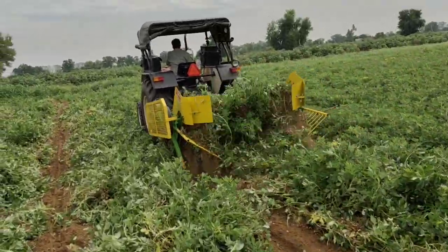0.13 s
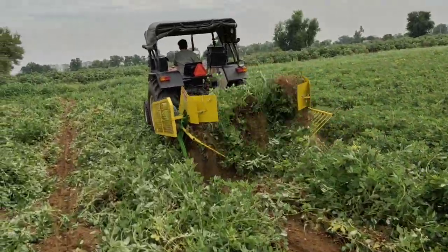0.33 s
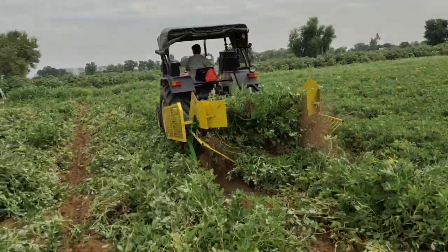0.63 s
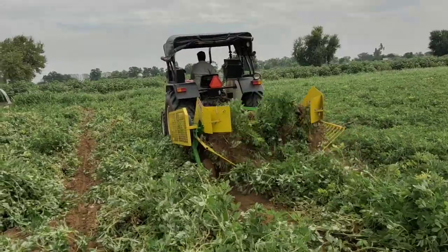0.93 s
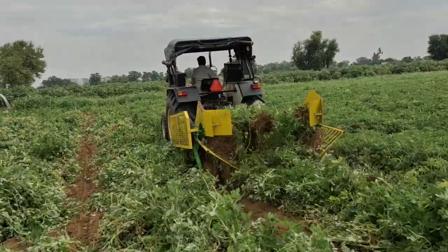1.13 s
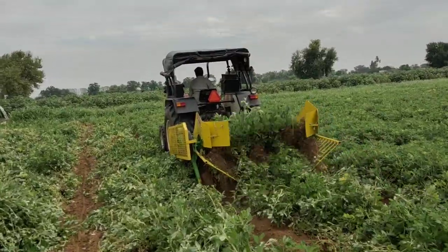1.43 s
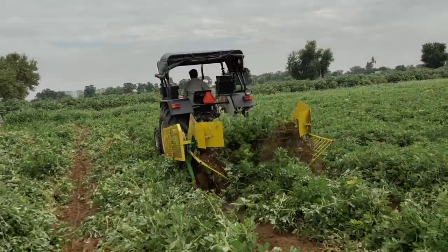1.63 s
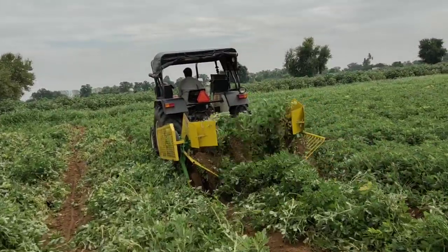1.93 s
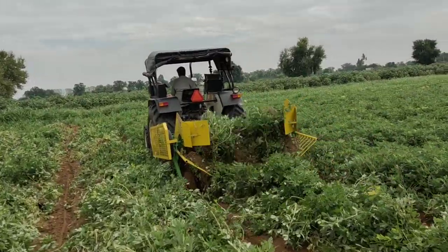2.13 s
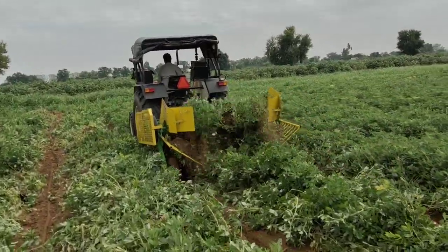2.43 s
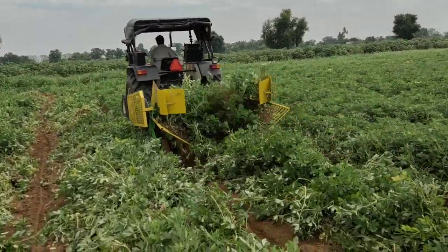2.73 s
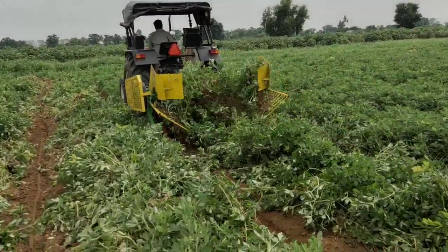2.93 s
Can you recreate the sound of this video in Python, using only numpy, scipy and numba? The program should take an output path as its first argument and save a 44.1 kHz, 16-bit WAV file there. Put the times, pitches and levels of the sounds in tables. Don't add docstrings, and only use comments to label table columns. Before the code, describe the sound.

Ringing metallic digger roar with gritty soil rattle and engine ticking, under bursts of low wind thumps.

```python
import sys
import numpy as np
from scipy import signal
from scipy.fft import rfft, irfft
from scipy.io import wavfile
from scipy.ndimage import uniform_filter1d
from numba import njit

SR = 44100
rng = np.random.default_rng(int(sys.argv[2]) if len(sys.argv) > 2 else 0)


def file_out(sig):
    cols = np.atleast_2d(sig).T
    lim = np.clip(cols, -1, 1)
    pcm = np.round(lim * 32767).astype(np.int16)
    wavfile.write(sys.argv[1], SR, pcm)


def gain_from_decibels(decibels):
    exponent = np.asarray(decibels, float) / 20
    return 10 ** exponent


N = 135387
TURNS_PER_S, FIRST_TURN_S = 28.71, 0.0021


def unit(x):
    return x / np.sqrt(np.mean(x ** 2))


def even(x):
    return x / np.sqrt(uniform_filter1d(x ** 2, SR // 10))


def curve(table, column):
    return np.interp(np.arange(N) / SR, np.array(table)[:, 0], np.array(table)[:, column])


def shape(table, hz):
    return np.interp(np.log(hz), np.log(np.array(table)[:, 0]), np.array(table)[:, 1])


def colour(x, table, tilt_db=0.):
    hz = np.maximum(np.arange(N // 2 + 1) * SR / N, 1)
    octaves_outside = np.maximum(np.log2(table[0][0] / hz), np.log2(hz / table[-1][0])).clip(0)
    gain_db = shape(table, hz) + tilt_db * np.log2(hz / 150) - 19 * octaves_outside
    return irfft(rfft(x) * gain_from_decibels(gain_db), N)


def band(x, hz, width):
    b, a = signal.iirpeak(hz, hz / width, fs=SR)
    return signal.lfilter(b, a, signal.lfilter(b, a, x))


def walk(rate):
    hold = int(SR / rate / 16)
    coarse = np.repeat(rng.standard_normal(N // (16 * hold) + 1), hold)
    coarse = uniform_filter1d(uniform_filter1d(coarse, hold), hold)
    return 1.3 * np.interp(np.arange(N) / 16, np.arange(len(coarse)), coarse)


def rings(rows, t60, pan_db, spread, attack_s=0.0028):
    out, t = np.zeros(N + 4096), np.arange(4096) / SR
    attack = np.sin(np.pi / 2 * np.minimum(t / attack_s, 1)) ** 2
    envelope = np.exp(-np.log(1000) * t / t60) * attack
    detunes = rng.standard_normal((len(rows), 5, 1))
    for (s, db, hz), detune in zip(rows, detunes):
        cluster = np.sin(2 * np.pi * hz * (1 + spread * detune) * t).sum(0) / 3
        start = int(s * SR)
        out[start:start + 4096] += gain_from_decibels(db) * envelope * cluster
    return out[:N] * gain_from_decibels(np.array([[pan_db], [-pan_db]]) / 2)


@njit
def sweep(x, hz, g, width):
    y = np.empty(x.shape)
    for c in range(x.shape[0]):
        b, l = 0., 0.
        for i in range(x.shape[1]):
            k = width / hz
            v = (b + g[i] * (x[c, i] - l)) / (1 + g[i] * (g[i] + k))
            b, l, y[c, i] = 2 * v - b, l + 2 * g[i] * v, k * v
    return y


# pitch in Hz, left over right in dB.
LEFT_OVER_RIGHT = [(60, 12), (110, -8), (200, 2.5), (380, 2.5), (700, -2.5), (1290, 4.5), (2380, 8),
                   (4400, 9), (8120, -1), (15000, -0.5)]
# pitch in Hz, share in common from 0 to 1.
LIKENESS = [(60, 1), (600, 0.99), (1400, 0.56), (3000, 0.44), (6000, 0), (15000, 0.04)]


def pair(hz, drive=1):
    likeness = np.clip(shape(LIKENESS, hz), 0, 1)
    mid, side = rng.standard_normal((2, N)) * drive
    sign = np.array([[1], [-1]])
    pan_db = shape(LEFT_OVER_RIGHT, hz) / 2 * sign
    return (np.sqrt((1 + likeness) / 2) * mid + np.sqrt((1 - likeness) / 2) * side * sign) * gain_from_decibels(pan_db)


# middle in seconds, length in seconds, pitch in Hz, gain in dB.
STRAINS = [(0.134, 0.12, 600, 25), (0.224, 0.17, 1520, 6.5), (0.398, 0.31, 2260, 3),
           (0.336, 0.11, 2970, 11), (0.457, 0.19, 1130, -7), (0.642, 0.12, 1900, 17),
           (0.736, 0.16, 3200, 7.5), (0.756, 0.36, 1160, -9.5), (0.835, 0.19, 2390, 6.5),
           (0.84, 0.078, 1520, 2), (0.918, 0.15, 970, 9.5), (1.152, .08, 693, 10),
           (1.242, 0.14, 3340, 10.5), (1.505, 0.3, 1830, 5), (1.668, 0.17, 1190, 12),
           (1.845, 0.82, 3555, 8), (1.87, 0.26, 693, 10), (2.11, 0.32, 2690, 10), (2.116, 0.11, 694, -16),
           (2.258, 0.15, 1000, 6), (2.263, 0.089, 2110, 8.5), (2.55, 0.097, 2080, 8),
           (2.628, 0.081, 680, 12.5), (2.736, 0.69, 1700, 6), (2.794, 0.32, 1270, 9),
           (2.866, 0.25, 2420, -4), (0.854, 0.47, 4270, 10), (2.496, 0.12, 4000, 6),
           (2.842, 0.2, 3300, -14)]


def strain(hz):
    t = np.arange(0, N + 256, 256) / SR
    db = 0
    for middle, length, centre, gain_db in STRAINS:
        octaves = np.log2(hz / centre)
        db = db + gain_db * np.exp(-(octaves / 0.13) ** 2 - (2 * (t - middle) / length) ** 4)
    return np.interp(np.arange(N) / SR, t, db)


def chain_links():
    links_per_s, first_link_s, depth = 62.5, 0.005, 0.3
    links = (np.arange(N) / SR - first_link_s) * links_per_s + 1
    size = gain_from_decibels(1.5 * rng.standard_normal(N // 500))[links.astype(int)]
    shove = 3 * size * np.exp(-(links % 1) / 0.11)
    return (1 - depth + depth * shove) * gain_from_decibels(1.6 * walk(900))


# pitch in Hz, width in Hz, level in dB.
FRAME = [(537.6, 132, -9), (682, 138, -7), (1011, 118, -1.5), (1130, 49, 0), (1308, 130, -6.5),
         (1520, 183, -3), (1747, 116, -4), (2125, 80, -8.5), (2260, 90, -3), (2485, 99, -3),
         (2760, 95, -7.5), (3072, 91, -8), (3300, 127, -6.5), (3847, 296, -14.5)]


def frame():
    drive = chain_links()
    modes = 0
    for hz, width, db in FRAME:
        g = np.tan(np.pi * hz / SR) * (1 + 0.032 * walk(4.894))
        swell_db = db + 3 * walk(12) + strain(hz)
        ring = sweep(pair(hz, drive), 1. * hz, g, 0.8 * width)
        ring = sweep(ring, 1. * hz, g, 2. * width)
        modes = modes + gain_from_decibels(swell_db) * np.sqrt(width) * unit(ring)
    return unit(modes)


# pitch in Hz, level in dB per Hz.
ROAR = [(70, -18), (150, -5.5), (320, -17), (600, -6), (820, -29), (1100, -9.5), (2500, -9), (4500, -37.5)]


def roar():
    bands = 0
    for hz in 100 * 2 ** np.arange(0, 5.6, .5):
        level_db = shape(ROAR, hz) + 2.2 * walk(13) + 0.76 * strain(hz)
        bands = bands + gain_from_decibels(level_db) * band(pair(hz), hz, hz / 3.1)
    return unit(bands)


# start in seconds, peak in dB, pitch in Hz.
CLANKS = [(0.2627, -31.5, 1624), (0.2927, -30, 2180), (0.4663, -30, 2150), (0.607, -36, 2070),
          (0.6409, -28, 1990), (0.7736, -34, 1530), (0.8464, -33.0, 1520), (0.8544, -31.5, 1450),
          (0.8704, -25.5, 2437), (0.9312, -47, 1030), (1.4141, -34.5, 1280), (1.4919, -31, 1140),
          (1.6516, -31.0, 1130), (1.6845, -28, 1130), (1.6985, -40, 1130), (1.7015, -31, 1685),
          (1.7304, -37, 1130), (1.7504, -28.5, 2306), (1.8671, -27, 1190), (1.8801, -39, 1170),
          (1.898, -31, 1750), (1.91, -32, 1750), (1.9389, -38, 1110), (1.9758, -30, 1710),
          (1.9978, -29, 2200), (2.0098, -31, 1730), (2.0507, -32.9, 1130), (2.0537, -28, 2380),
          (2.0696, -35, 1070), (2.0836, -30.5, 1094), (2.0996, -33.3, 1516), (2.1155, -40, 1130),
          (2.1794, -32.2, 1575), (2.2163, -27, 1074), (2.2253, -32.5, 1080), (2.2422, -30, 2030),
          (2.2742, -30, 2100), (2.2831, -37, 1040), (2.3869, -39, 1130), (2.4039, -36, 1580),
          (2.5176, -31, 1736), (2.5376, -30.5, 1730), (2.5855, -29, 1745), (2.6294, -31, 1350),
          (2.6493, -34.5, 1760), (2.6643, -33.0, 1550), (2.6962, -29, 2190), (2.7052, -27.5, 1180),
          (2.7162, -32.6, 1130), (2.7601, -32, 1750), (2.775, -30, 1190), (2.793, -29, 1740),
          (2.806, -26, 1180), (2.8209, -28, 1190), (2.8369, -30, 1196), (2.8568, -27, 1720),
          (2.8688, -32, 1493), (2.8788, -33, 1210), (2.9087, -38, 1490), (2.9816, -33.8, 1620)]


def clanks():
    return rings(CLANKS, 0.068, 4.5, 0.025, 0.0032) * gain_from_decibels(-2.5)


# time in seconds, frame level in dB.
DIGGER_LEVEL = [(0, -38.5), (.04, -46), (.25, -46), (.31, -41), (.55, -42.5), (.66, -37.5), (.92, -39), (1.18, -44),
                (1.4, -41.5), (1.52, -38.5), (1.75, -38), (2.28, -37.5), (2.45, -38.5), (2.8, -39), (2.92, -40),
                (2.98, -44.5), (3.07, -42)]


def digger():
    return (frame() + gain_from_decibels(-5) * roar()) * gain_from_decibels(curve(DIGGER_LEVEL, 1)) + clanks()


# time in seconds, level in dB.
SOIL = [(0, -59.5), (.04, -67.5), (.25, -62), (.55, -67.5), (.65, -60), (.8, -63), (1, -64), (1.2, -70.5),
        (1.5, -64.5), (1.9, -60.5), (2.26, -69.5), (2.55, -62), (2.8, -59.5), (2.98, -62.5), (3.07, -60.5)]
# pitch in Hz, level in dB per Hz.
RATTLE = [(4200, -8), (5100, -10.5), (5900, -7.5), (6800, -16.5), (7700, -7), (9200, -9), (12000, -15.5),
          (15000, -13.5)]


def soil():
    turn = (np.arange(N) / SR - FIRST_TURN_S) * TURNS_PER_S % 1
    flicker = gain_from_decibels(1.8 * walk(14) + 1.8 * walk(700))
    drive = flicker * (1 + 1.6 * np.exp(-turn / 0.3))
    grit = 0
    for hz in 4600 * 2 ** np.arange(0, 1.8, .33):
        grit = grit + gain_from_decibels(0.5 * walk(26)) * band(pair(hz, drive), hz, hz / 3) / np.sqrt(hz)
    return unit(colour(grit, RATTLE)) * gain_from_decibels(curve(SOIL, 1) + 2.5)


# multiple of the turn, level in dB.
ORDERS_DB = [
    (2, -62.5),
    (3, -51),
]


def engine_hum():
    t = np.arange(N) / SR
    phase = 2 * np.pi * TURNS_PER_S * t + 0.071 * walk(3.12)
    hum = 0
    for order, db in ORDERS_DB:
        level_db = db - 1.2 * t + 0.6 * walk(8.2)
        hum = hum + np.sqrt(2) * gain_from_decibels(level_db) * np.sin(order * phase)
    return hum


# start in seconds, peak in dB, pitch in Hz.
TICKS = [(0.179, -48, 5430), (0.3546, -53, 5970), (0.4193, -47, 5770), (0.735, -41, 6040),
         (2.0222, -48, 5850), (2.091, -39, 5900), (2.718, -42, 5900), (2.438, -44, 5720),
         (2.5066, -41.5, 5380), (2.5436, -43, 5600), (2.613, -43, 6000), (2.6468, -37, 5900),
         (2.6838, -46, 6060), (2.7533, -36.5, 6100), (2.7881, -41, 6300), (2.822, -36, 6460),
         (2.8596, -37, 5920), (2.929, -44, 5870)]


def valve_ticks():
    t60_s, floor_db = 0.026, -58.5
    times = np.arange(FIRST_TURN_S, N / SR, 1 / TURNS_PER_S)
    chance = rng.standard_normal((len(times), 2))
    soil_db = np.interp(times, *np.array(SOIL).T) + 62
    faint = np.c_[times, floor_db + 3 * chance[:, 0] + soil_db, 5850 + 200 * chance[:, 1]]
    bright = np.array(TICKS) * [1, 1, 1.5]
    ticks = rings(faint, t60_s, 2.5, 0.091) + rings(TICKS, t60_s, 5.8, 0.044)
    return ticks + rings(bright, 0.016, -1.5, 0.102) * gain_from_decibels(-9)


def engine():
    return engine_hum() + valve_ticks()


# start in seconds, peak in dB, pitch in Hz.
THUMPS = [(0.2054, -16, 172), (0.2278, -15.5, 160), (0.2453, -25, 153), (0.2952, -14, 183),
          (0.3226, -16, 199), (0.3376, -15, 129), (0.3825, -16.5, 161), (0.5521, -16, 161),
          (0.9562, -36, 242), (1.0385, -16, 233), (1.1457, -11.5, 158), (1.1682, -14, 165),
          (1.1906, -23, 179), (1.233, -9.5, 234.5), (1.2605, -28, 182), (1.3577, -14, 180),
          (1.3902, -18, 182), (1.4251, -11, 162.4)]


def wind_slaps():
    return rings(THUMPS, 0.079, 17, 0.248, 0.0084) * gain_from_decibels(-7)


# time in seconds, left level in dB, right level in dB.
GUSTS = [(0, -27.5, -32.5), (.06, -26, -29), (.19, -25.5, -35.5), (.24, -23.5, -37), (.38, -24, -34.5),
         (.56, -34.5, -32.5), (.68, -52, -47), (.91, -50.5, -45), (.96, -25.5, -43), (1.02, -30, -34.5),
         (1.24, -23.5, -39.5), (1.55, -29, -35.5), (1.66, -55.5, -67), (2, -59, -47), (2.22, -53, -59),
         (2.27, -35, -42.5), (2.38, -37.5, -43), (2.45, -48, -56), (2.55, -55, -44.5), (2.6, -35.5, -43),
         (2.74, -33.5, -46.5), (2.82, -49, -48.5), (2.94, -32.5, -44), (3.07, -38, -40.5)]
# pitch in Hz, level in dB per Hz.
PORT_LEFT = [(29, -20), (50, -62), (79, -3), (195, 1), (349, -7.5), (570, -24.5), (600, -31), (780, -57),
             (1320, -120)]


def wind():
    ports = []
    for column, tilt_db in ((1, 0), (2, -7)):
        eddies = rng.standard_normal(N) * gain_from_decibels(2.5 * walk(70))
        ports.append(even(colour(eddies, PORT_LEFT, tilt_db)) * gain_from_decibels(curve(GUSTS, column)))
    overload = 0.23
    return overload * np.tanh((np.array(ports) + wind_slaps()) / overload)


def scene():
    return digger() + soil() + engine() + wind()


def roll_off(x):
    return signal.sosfilt(signal.butter(12, 15500, fs=SR, output="sos"), x)


def record(dry):
    low_cut = signal.butter(4, 47, "high", fs=SR, output="sos")
    end = np.minimum(np.arange(N)[::-1] / 40, 1)
    return roll_off(signal.sosfilt(low_cut, dry) * end)


dry = scene()
out = record(dry)
file_out(out)
```